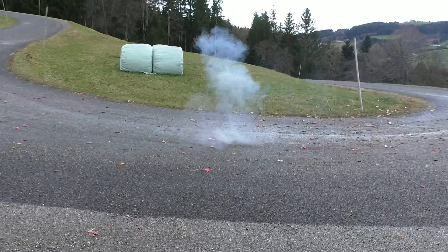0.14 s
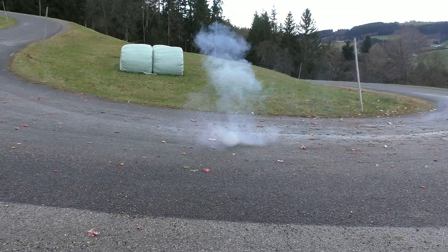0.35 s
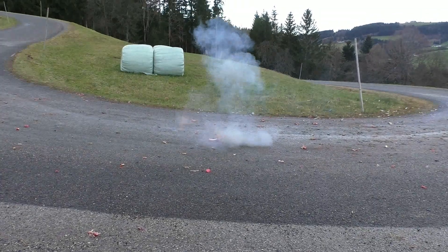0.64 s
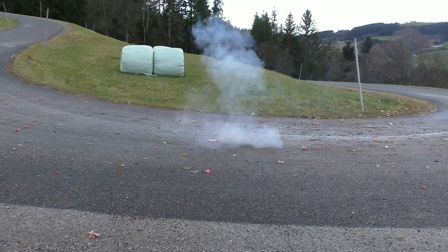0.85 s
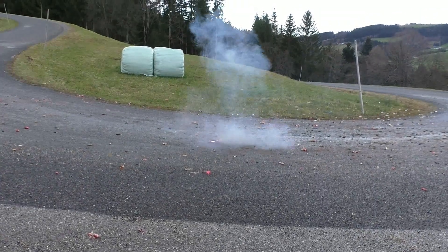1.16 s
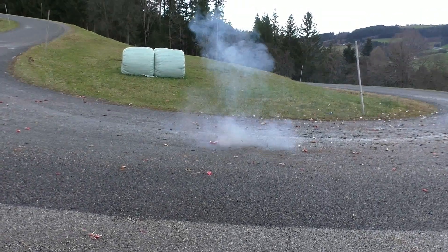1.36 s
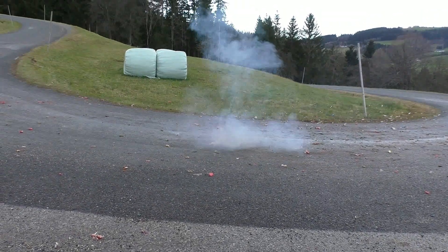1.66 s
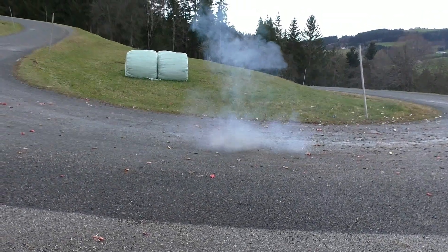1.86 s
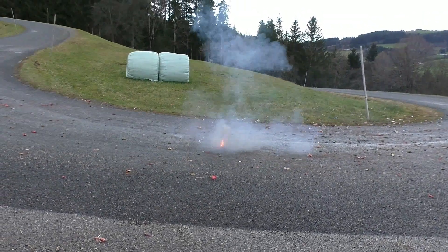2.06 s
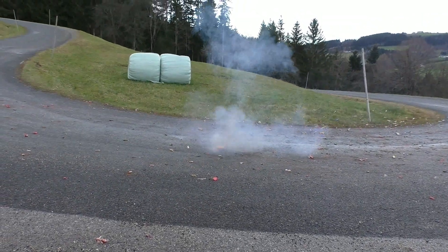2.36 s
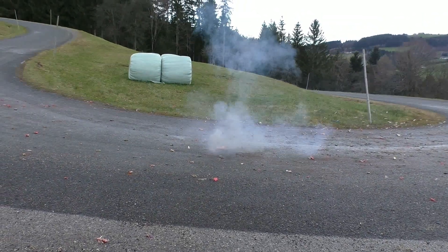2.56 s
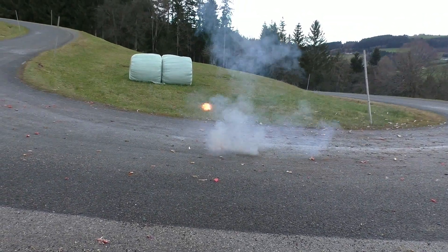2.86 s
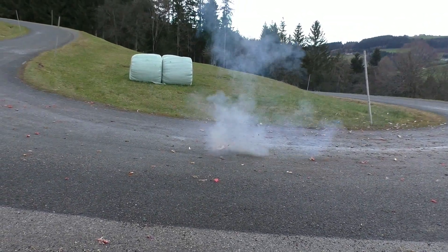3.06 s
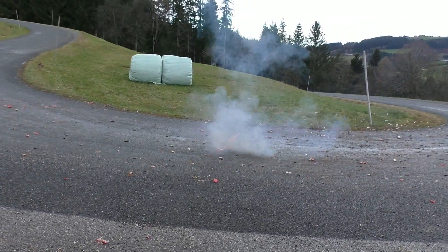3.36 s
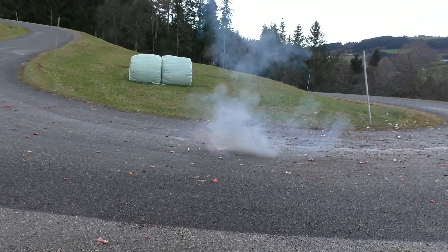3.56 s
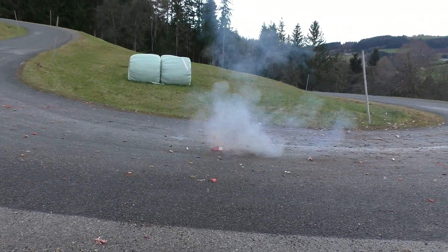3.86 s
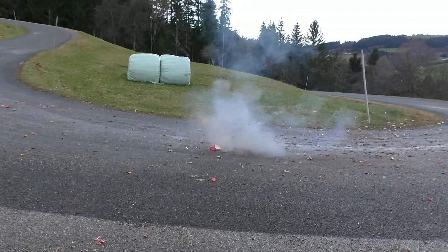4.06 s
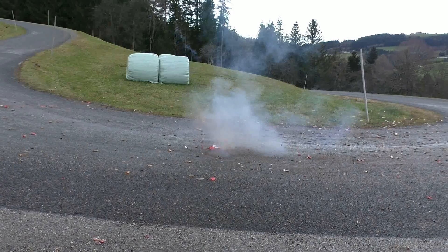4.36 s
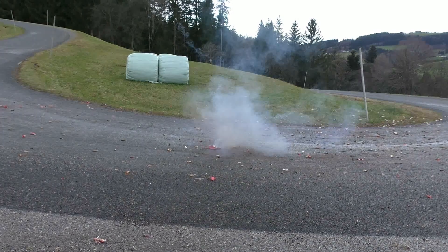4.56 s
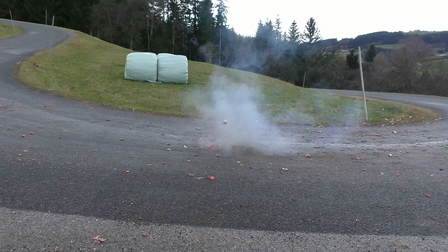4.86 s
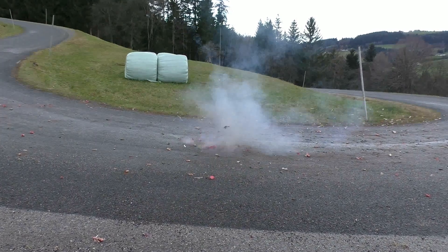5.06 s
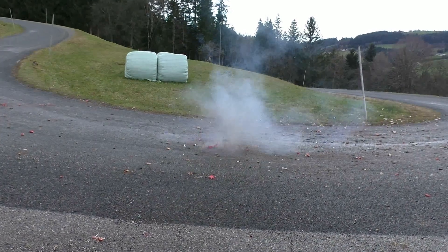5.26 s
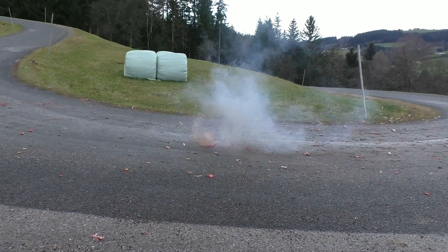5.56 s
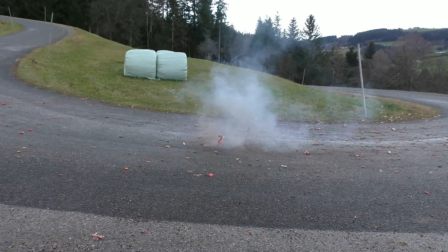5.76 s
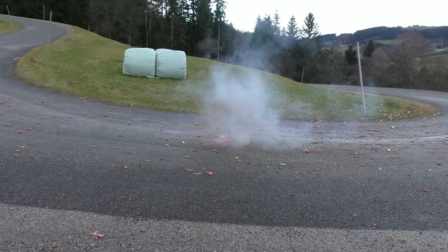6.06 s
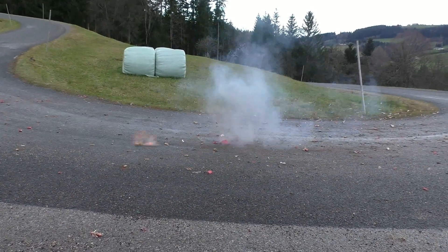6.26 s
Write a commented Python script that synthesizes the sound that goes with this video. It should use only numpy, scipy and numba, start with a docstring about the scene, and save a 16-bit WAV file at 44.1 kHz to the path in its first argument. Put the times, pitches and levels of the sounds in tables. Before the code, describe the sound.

Outdoors on an open road bend by a wood, a firecracker string is already burning: a fluttering mid-band roar of echoes and a thin, high fuse sizzle. A heavy bang comes at 0.3 s, a close double at 0.53, another at 1.28, then singles at 1.67, 2.05 and a duller one at 2.16. After a gap, bangs resume at 2.76 and 2.97 and crowd together from 3.1 to 4.3, with an especially full one at 3.58. They thin out to 4.8, 5.15 and 5.5, a tight double at 5.67, then a last bang at 6.37. Each is a dry crack with tearing paper and a short low thump, answered by a hard slap about 60 milliseconds later and grainy wash from ground and trees. Sizzle weakens later. The nearby stereo camera clips softly and ducks after the loud cracks.

```python
"""Open asphalt bend, wood beyond: a string of firecrackers burns some metres from a stereo camera.
Each cracker bursts as a shock, tearing paper and a low thump (clicks through filters, swinging sines).
Reflectors slap it back as band-limited clicks; ground and wood return a wash of decaying noise.
The fuse sizzles over a broad mid-band roar, both filtered noise; the camera turns its gain down on
each overload."""
import sys
import numpy as np
from scipy import signal
from scipy.fft import rfft, irfft
from scipy.io import wavfile
from scipy.ndimage import uniform_filter1d, minimum_filter1d
from numba import njit

SR = 44100
rng = np.random.default_rng(int(sys.argv[2]) if len(sys.argv) > 2 else 0)


def store_wav(level_fs):
    """Save 16-bit WAV to argv[1]."""
    pcm = np.round(np.clip(np.atleast_2d(level_fs), -1, 1) * 32767)
    wavfile.write(sys.argv[1], SR, pcm.T.astype(np.int16))


def to_linear_factor(level_db):
    """Convert decibel levels (scalar or array-like) to linear amplitude factors."""
    exponent = np.asarray(level_db, float) / 20
    return 10 ** exponent


N = 283101


def colour(x, points):
    """Minimum-phase filter with the given spectrum; its response has energy 1."""
    hz, db = np.transpose(points)
    grid_hz = np.arange(1, 2050) * SR / 4096
    log_gain = np.interp(np.log(grid_hz), np.log(hz), db) * np.log(10) / 20
    cepstrum = irfft(log_gain)
    # fold onto positive time: causal
    half = len(cepstrum) // 2
    cepstrum[1:half] *= 2
    cepstrum[half + 1:] = 0
    response = irfft(np.exp(rfft(cepstrum)))
    response = response / np.linalg.norm(response)
    kernel = np.broadcast_to(response, x.shape[:-1] + response.shape)
    return signal.oaconvolve(x, kernel, axes=-1)[..., :x.shape[-1]]


def ring(x, hz, width_hz):
    """One resonance, gain 1 at its centre."""
    return signal.lfilter(*signal.iirpeak(hz, hz / width_hz, fs=SR), x)


def train(s, size):
    """Clicks of the given sizes at the given times."""
    out = np.zeros(N)
    at = np.round(np.ravel(s) * SR).astype(int)
    inside = at < N
    np.add.at(out, at[inside], np.ravel(size)[inside])
    return out


def panned(x, pan_db):
    """Left and right, pan_db apart."""
    return x * to_linear_factor(np.array([pan_db, -pan_db]).reshape(2, -1) / 2)


def walk(rate_hz):
    """Random levels held 1 / rate_hz and slewed twice."""
    k = int(SR / rate_hz)
    steps = np.repeat(rng.standard_normal(N // k + 1), k)
    return uniform_filter1d(uniform_filter1d(steps, k), k)[:N]


def spread(mid, side, likeness):
    """Left and right from two unrelated sounds."""
    likeness = np.clip(likeness, 0, 1)
    return np.sqrt(likeness) * mid + np.sqrt(1 - likeness) * side * np.array([[1], [-1]])


def scattered(s, db, shape_db, points, likeness):
    """Dense small echoes after each bang, as noise; their powers add. Bangs may lie up to 1 s back."""
    shocks = np.zeros(SR + N)
    shocks[SR + (np.array(s) * SR).astype(int)] = to_linear_factor(db) ** 2
    power = signal.fftconvolve(shocks[None], to_linear_factor(shape_db) ** 2, axes=1)[:, SR:SR + N]
    noise = spread(*rng.standard_normal((2, N)), likeness)
    return colour(np.sqrt(np.abs(power)) * noise, points)


# fuse sizzle and mid-band roar: (time [s], sizzle [dB], roar [dB])
SIZZLE_ROAR_LEVELS = [(0.0, -53.5, -41), (0.37, -51, -45), (0.53, -54.5, -37.5), (0.7, -56.5, -43.5),
                      (1.18, -51, -43.5), (1.45, -61.5, -38), (1.66, -52, -40.5), (1.859, -62, -40),
                      (2.66, -58, -43.5), (3.2, -62.5, -48.5), (3.81, -56.5, -39.5), (4.311, -68, -59),
                      (4.988, -58, -47.5), (5.55, -57, -47), (5.7, -61, -41), (6.0, -59, -56),
                      (6.22, -62, -52), (6.42, -62, -41)]
# thin sizzle spectrum: (frequency [Hz], density [dB per Hz])
SIZZLE_COLOUR = [(3820, -30), (7200, -12), (8670, -2), (11000, -5), (12800, -22), (15700, -19),
                 (16300, -30), (16500, -59)]
# roar spectrum: (frequency [Hz], density [dB per Hz])
ROAR_COLOUR = [(18, -47), (30, -34), (96, -15.5), (186, 0), (281, 0), (377, -7), (544, -10), (839, -10),
               (1240, -1.5), (1780, -1.5), (3450, -11.5), (7000, -20.5), (9100, -57), (15400, -120)]
# treble of the roar: (frequency [Hz], density [dB per Hz])
ROAR_TREBLE_COLOUR = [(2500, -28), (4000, 6), (5500, -1), (7500, -4.5), (9500, -25)]


def fuse_and_roar(flutter_db_per_unit=3, flicker_db_per_unit=2):
    """Burning powder sizzles over a broad mid-band roar, probably long valley reverberation.

    The roar flutters; its treble rises with it, but less steeply.
    """
    s, *levels_db = np.transpose(SIZZLE_ROAR_LEVELS)
    sizzle_db, roar_db = (np.interp(np.arange(N) / SR, s, db) for db in levels_db)
    usual_roar_db, usual_treble_db, treble_db_per_db = -46.5, -57, 0.68
    treble_db = usual_treble_db + treble_db_per_db * (roar_db - usual_roar_db)
    flutter_db = flutter_db_per_unit * walk(300) + flicker_db_per_unit * walk(19)
    sizzle_db = sizzle_db + flicker_db_per_unit * walk(37)
    sizzle = colour(rng.standard_normal(N) * to_linear_factor(sizzle_db), SIZZLE_COLOUR)
    roar = colour(rng.standard_normal(N) * to_linear_factor(roar_db + flutter_db), ROAR_COLOUR)
    treble = colour(rng.standard_normal(N) * to_linear_factor(treble_db + flutter_db), ROAR_TREBLE_COLOUR)
    return sizzle + roar + treble


# bangs before the start, only their wash is heard: (time [s], level thrown at the wood [dB])
UNHEARD_BANGS = [(-.55, -0.5), (-.11, -14.5)]
# return of slope and wood:
# (lag [s], level [dB], level of the bright, snap-coloured part [dB], left minus right [dB])
WASH = [(0, -13.5, -12.5, 1), (.03, -34.5, -33, -1), (.06, -31, -36.5, 5.5), (0.143, -37.5, -58, 1.5),
        (0.156, -29, -45, -4), (.2, -33.5, -51, -7.5), (.27, -39, -54, -5.5), (.33, -41, -59, -4.5),
        (.45, -47, -62, 8), (.7, -43, -53, -1), (1.201, -85, -65, 14)]
# wash spectrum, wood and ground: (frequency [Hz], density [dB per Hz])
WASH_COLOUR = [(35, -40), (60, -37), (198, -10.5), (273, -2.5), (406, -7), (783, -9.5), (1010, -4),
               (1420, -0.5), (2040, 0), (3700, -9), (7000, -24.5), (9100, -72), (15400, -120)]


def wood(trunk_db_per_unit=6.5, trunk_bright_db_per_unit=1.5):
    """Slope and tree trunks scatter; larger trunks stand out at the same lags after every bang."""
    lag, wash_db, bright_db, pan_db = np.transpose(WASH)
    t = np.arange(int(lag[-1] * SR)) / SR
    trunks = walk(300)[:len(t)]
    sides_db = np.interp(t, lag, pan_db) * np.array([[.5], [-.5]])
    wash_shape_db = np.interp(t, lag, wash_db) + trunk_db_per_unit * trunks
    bright_shape_db = np.interp(t, lag, bright_db) + trunk_bright_db_per_unit * trunks
    s, db, snap_db = np.transpose(BANGS)[:3]
    before_s, before_db = np.transpose(UNHEARD_BANGS)
    wash_thrown_db = -10.5 - 0.1053 * db
    bright_thrown_db = -15 + 0.5971 * (db + snap_db)
    all_s = np.r_[before_s, s]
    wash = scattered(all_s, np.r_[before_db, wash_thrown_db], sides_db + wash_shape_db,
                     WASH_COLOUR, likeness=0.75)
    bright = scattered(all_s, np.r_[before_db, bright_thrown_db], sides_db + bright_shape_db,
                       SNAP_COLOUR, likeness=0.75)
    return wash + bright


def thumps(s, db, hz, fade_ms, sag_db, glide_ms=0.35):
    """Air pushed out swings back under rest pressure, quickly at first, and settles; a slower sag joins."""
    out, t = np.zeros(N + SR), np.arange(SR // 20) / SR
    sag = to_linear_factor(sag_db) * np.sin(2 * np.pi * 60 * t) * np.exp(-t / 0.0021)
    hurried = t + glide_ms / 1000 * (1 - np.exp(-t / 0.00089))
    fade = np.exp(-1000 * t / fade_ms)
    for at, gain, swing_hz in zip(np.round(s * SR).astype(int), to_linear_factor(db), hz):
        out[at:at + len(t)] += gain * (np.sin(2 * np.pi * swing_hz * hurried) * fade - sag)
    return out[:N]


# crackers: (time [s], burst [dB], snap over burst [dB], thump [dB], share thrown at the flat face [dB])
BANGS = [(0.2926, 8.5, 0, -5, -1), (0.5274, 4.5, 6.5, -9, 0.5), (0.5405, 0, 3, -7, -10),
         (1.2708, 0, 8, -12, -4), (1.292, 0, 3.5, -7, 4), (1.6664, 4, 7, -7.5, 0), (2.0502, 4, 6, -7.5, 2),
         (2.158, 2.5, -8.5, -7.5, -11), (2.7638, 2, 8, -9.5, 1.5), (2.9722, 6.5, 3.5, -8, -3.5),
         (3.1243, 0.5, 6.5, -8.5, 2), (3.4693, 3, 5.5, -8.5, 1), (3.583, 9.5, -0.5, -4.5, 3),
         (3.7619, 5.5, 4.5, -8, 2.5), (3.933, 4, 4.5, -7, 5), (4.0441, 6, 5.5, -7, -3.5),
         (4.2786, 5, 4.5, -10.5, -2.5), (4.816, 5.5, 2, -9.5, 4.5), (5.149, 4.5, 6.5, -8.5, 6.5),
         (5.4793, 4.5, 4.5, -10.5, 5.5), (5.6653, 3, 4.5, -11, 2.5), (5.6859, -0.5, 3, -10, 4),
         (6.3702, 7, 0.5, -8.5, 5)]
# burst spectrum: (frequency [Hz], density [dB per Hz])
BURST_COLOUR = [(290, -45), (500, -4.5), (728, 1), (1250, 2.5), (2560, -3.5), (3020, -4), (3380, -4),
                (5250, -15), (7000, -6), (9100, -32.5), (15400, -120)]
# snap spectrum, also bright part of ground and wood: (frequency [Hz], density [dB per Hz])
SNAP_COLOUR = [(3240, 1), (5500, 0.5), (7560, -7), (8410, 0.5), (11700, -4), (14200, -7.5), (15800, -15),
               (16800, -105)]


def bangs(thump_db, thump_hz, tear_ms=2.3, snap_fade_ms=0.92, first=0.73, apart_db=-8):
    """Direct sound: the shock, then the paper case tearing in uneven cracks, the sharpest ones first."""
    s, db, snap_db = np.transpose(BANGS)[:3]
    smothered_db = 0.5  # below this snap the paper tears more weakly
    tear = np.minimum(to_linear_factor(snap_db - smothered_db), 1)
    chance = rng.random((len(s), 3, 12))
    later = np.arange(12) > 0
    lag_s = tear_ms / 1000 * chance[:, 0] * later
    size = np.where(later, (2 * chance[:, 1] - 1) * tear[:, None], first)
    # cracks lie a little apart: a small share differs left and right
    mid_side = size, to_linear_factor(apart_db) * size * np.sign(chance[:, 2] - .5)
    at, snap_fade = s[:, None] + lag_s, np.exp(-1000 * lag_s / snap_fade_ms)
    burst = [train(at, to_linear_factor(db)[:, None] * share) for share in mid_side]
    snap = [train(at, to_linear_factor(db + snap_db)[:, None] * share * snap_fade) for share in mid_side]
    mid, side = colour(np.array(burst), BURST_COLOUR) + colour(np.array(snap), SNAP_COLOUR)
    return mid + side * np.array([[1], [-1]]) + thumps(s, thump_db, thump_hz, fade_ms=3.8, sag_db=0.5)


def ground(wash_db=-22.0, wash_t60_s=0.074, bright_db=-38, bright_t60_s=0.11):
    """Road and verge scatter the bang for a few hundredths of a second, more after a sharp tear."""
    s, db, snap_db = np.transpose(BANGS)[:3]
    fall_db = -60 * np.arange(SR // 5)[None] / SR * np.ones((2, 1))
    wash = scattered(s, db + 0.65 * snap_db + wash_db, fall_db / wash_t60_s, WASH_COLOUR, likeness=0.68)
    bright = scattered(s, db + snap_db + bright_db, fall_db / bright_t60_s, SNAP_COLOUR, likeness=1.0)
    return wash + bright


# snap spectrum off a reflector: (frequency [Hz], density [dB per Hz])
SLAP_COLOUR = [(2500, -13), (4500, 1.5), (8000, -2.5), (12000, -10.5), (16500, -31)]


def slaps(table, s, db, source_thump_db, source_snap_db, thump_hz, scatter_db, scatter_ms, fade_ms,
          glide_ms):
    """Reflectors return the shock turned over, each in its own band; crackers lie apart: lag, size vary."""
    road_lag_ms, width = 0.42, 0.32  # width: share of the centre frequency
    out = 0
    for lag_ms, slap_db, pan_db, hz, thump_db, snap_db in table:
        chance = rng.standard_normal((len(s), 2)).T
        at = s + (lag_ms + scatter_ms * chance[0]) / 1000
        vary_db = scatter_db * chance[1]
        crack = train(at, to_linear_factor(db + slap_db + vary_db))
        crack = ring(ring(crack, hz, width * hz), hz, width * hz)
        # snap comes twice: through the air and off the asphalt
        twice = np.array([at, at + road_lag_ms / 1000])
        snap_size = to_linear_factor(source_snap_db + snap_db + vary_db) * np.ones((2, 1))
        snap = colour(train(twice, snap_size), SLAP_COLOUR)
        knock = thumps(at, source_thump_db + thump_db + vary_db, thump_hz, fade_ms, -16, glide_ms)
        out = out + panned(knock - crack - snap, pan_db)
    return out


# close reflectors, lag from the bang:
# (lag [ms], crack [dB], left minus right [dB], centre [Hz], thump [dB], snap [dB])
NEAR_SLAPS = [(4.6, 7, 15, 2790, -3.5, -19), (10.7, -15, -50, 2220, -31, -48.5)]


def near_objects(thump_hz):
    """Close objects return crack, snap and thump within some ten milliseconds."""
    s, db, snap_db, thump_db, _ = np.transpose(BANGS)
    return slaps(NEAR_SLAPS, s, db, thump_db, db + snap_db, thump_hz,
                 scatter_db=3, scatter_ms=0.39, fade_ms=1.83, glide_ms=0.308)


def thrown_far(knock_hz=227, knock_db_per_db=0.4):
    """Crack, thump and snap levels thrown at the far reflectors, with the pitch of the knock."""
    s, db, _, thump_db, face_db = np.transpose(BANGS)
    return db + face_db, thump_db + knock_db_per_db * face_db, db + face_db, np.full(len(s), knock_hz)


# smaller far reflectors:
# (lag [ms], crack [dB], left minus right [dB], centre [Hz], thump [dB], snap [dB])
FAR_SLAPS = [(36.5, -17, 11, 2000, -36, -40), (77, -24.5, -18, 3800, -49.5, -44),
             (93.5, -7.5, 0, 2150, -37.5, -42), (326, -21.5, 4, 1300, -40.5, -51)]


def far_objects():
    """Smaller far reflectors return weak late slaps."""
    s = np.transpose(BANGS)[0]
    return slaps(FAR_SLAPS, s, *thrown_far(), scatter_db=0.5, scatter_ms=0.64, fade_ms=5.0, glide_ms=1.12)


# large flat face some ten metres off, two bands:
# (crack [dB], left minus right [dB], centre [Hz], thump [dB], snap [dB])
FACE = [(3.5, 1.5, 2670, -17.5, -30), (-5, 2, 3950, -32, -39)]


def flat_face(lag_ms=63.5, scatter_ms=0.5):
    """A large flat face slaps back in two bands at one lag; its knock starts high and falls."""
    s = np.transpose(BANGS)[0]
    at_face = s + (lag_ms + scatter_ms * rng.standard_normal(len(s))) / 1000
    table = [(0, *row) for row in FACE]
    return slaps(table, at_face, *thrown_far(), scatter_db=2.5, scatter_ms=0, fade_ms=4.45, glide_ms=1.68)


def scene():
    """Fuse, roar, bangs and their echoes."""
    thump_db = np.transpose(BANGS)[3]
    # the swing differs a little from cracker to cracker
    thump_hz = 318 * np.exp(0.12 * rng.standard_normal(len(BANGS)))
    direct = fuse_and_roar() + wood() + bangs(thump_db, thump_hz) + ground()
    return direct + near_objects(thump_hz) + far_objects() + flat_face()


@njit
def follow(x, attack, release):
    """Level follower with separate rates, per sample, for rise and fall."""
    out, e = np.empty(len(x)), 0.
    for i in range(len(x)):
        e += (x[i] - e) * (attack if x[i] > e else release)
        out[i] = e
    return out


def duck(x, duck_db=-5, threshold=0.8, hold_s=0.13, attack_s=0.0045, release_s=0.0067):
    """An overload pulls the gain down and holds it a moment."""
    overload = 1. * (np.abs(x).max(axis=0) > threshold)
    hold = int(hold_s * SR) // 2 * 2 + 1
    held = -minimum_filter1d(-overload, hold, origin=hold // 2, mode="constant")
    return x * to_linear_factor(duck_db * follow(held, 1 / (attack_s * SR), 1 / (release_s * SR)))


# camera response shape: (frequency [Hz], level [dB])
CAMERA_COLOUR = [(30, 0.5), (100, 4.5), (200, -4), (560, -1), (790, -5), (1050, 0), (4000, -1.5), (7000, 1),
                 (11000, 3), (16500, 3.5)]


def camera_tone(x, gain_db=2.0):
    """Camera response, scaled to energy 1, then gain."""
    return to_linear_factor(gain_db) * colour(x, CAMERA_COLOUR)


def top_cut(x):
    """Nothing passes above the cut-off."""
    return signal.sosfilt(signal.butter(12, 16980, fs=SR, output="sos"), x)


def record(dry, top=1.0):
    """Gain ducks on overload; the first cracks get through and clip softly."""
    clipped = top * np.tanh(duck(dry) / top)
    mix = camera_tone(clipped)
    return top_cut(mix)


dry = scene()
out = record(dry)
store_wav(out)
```